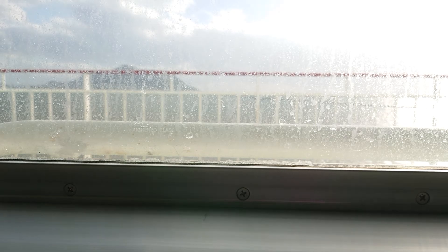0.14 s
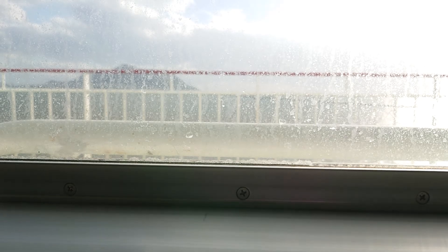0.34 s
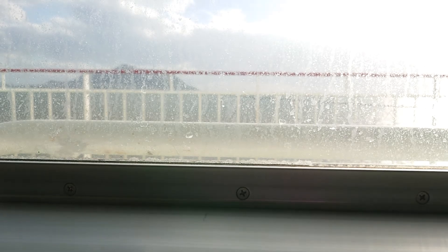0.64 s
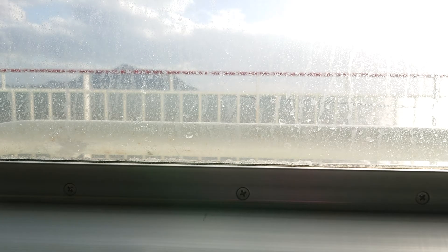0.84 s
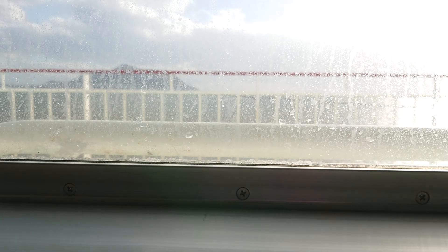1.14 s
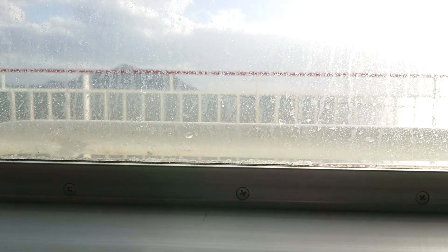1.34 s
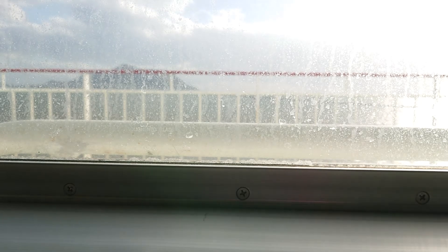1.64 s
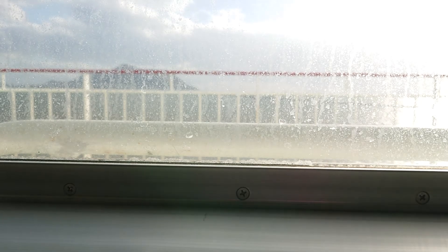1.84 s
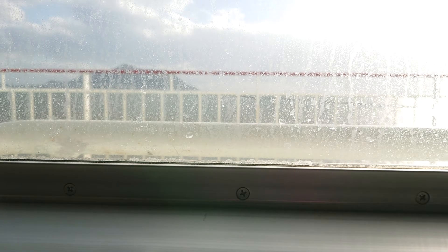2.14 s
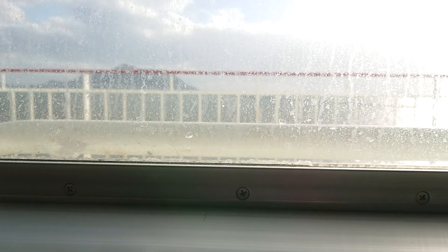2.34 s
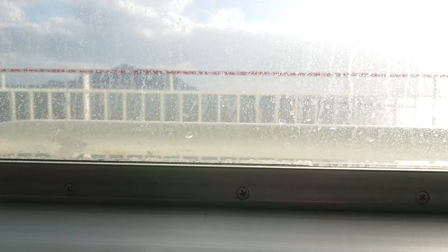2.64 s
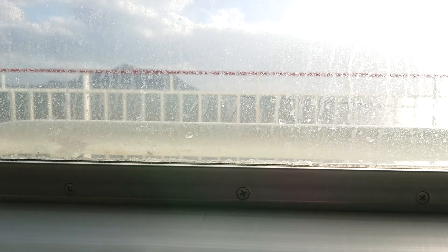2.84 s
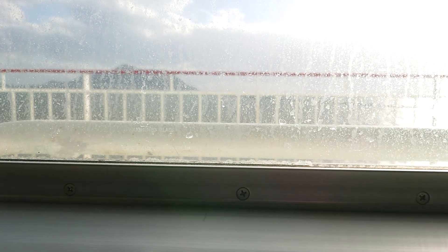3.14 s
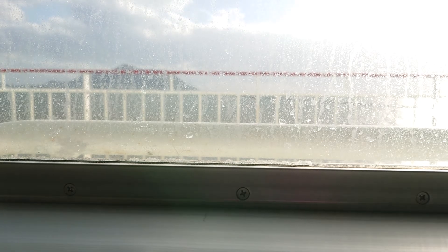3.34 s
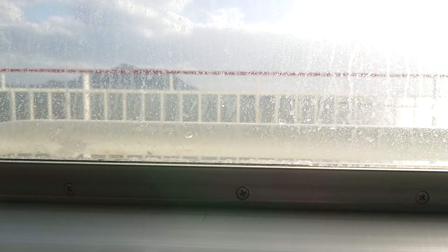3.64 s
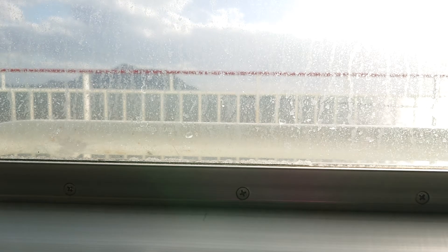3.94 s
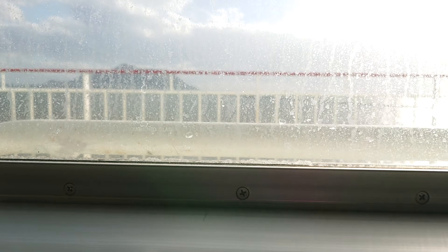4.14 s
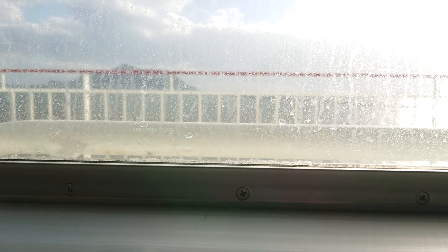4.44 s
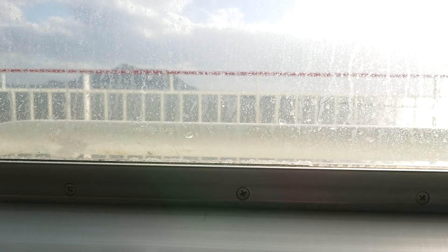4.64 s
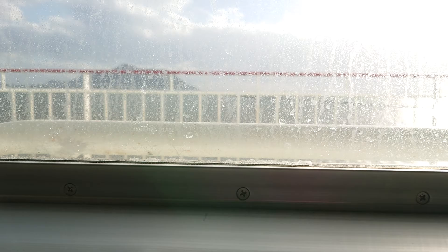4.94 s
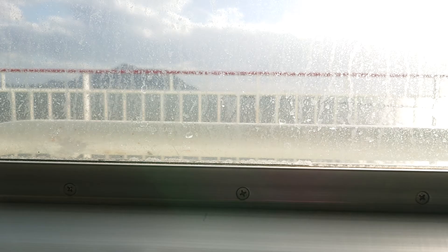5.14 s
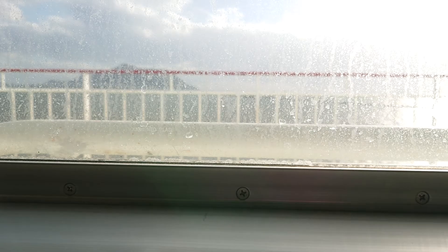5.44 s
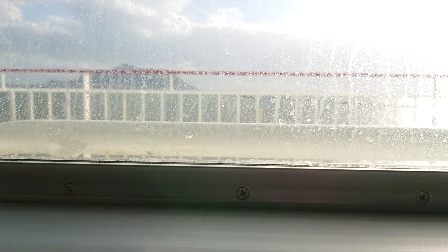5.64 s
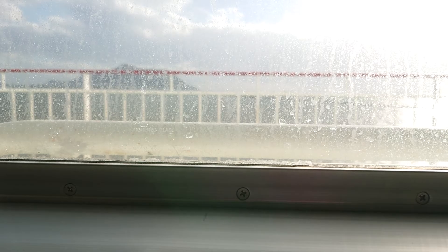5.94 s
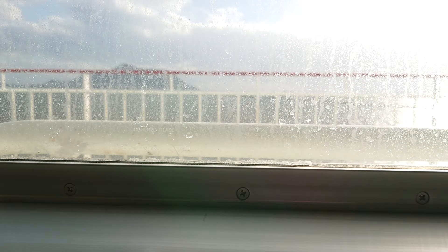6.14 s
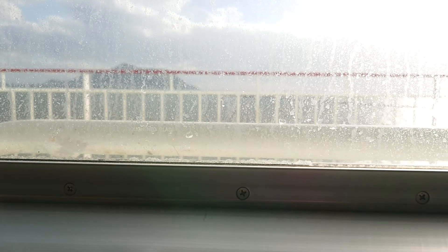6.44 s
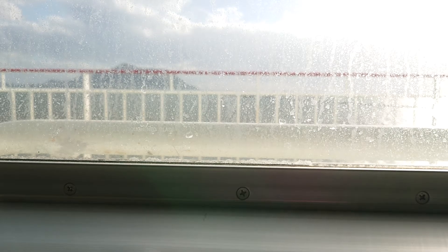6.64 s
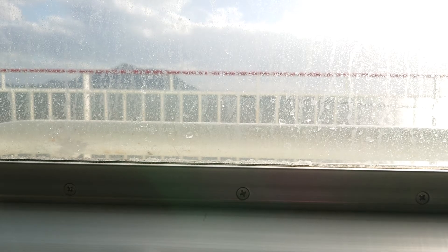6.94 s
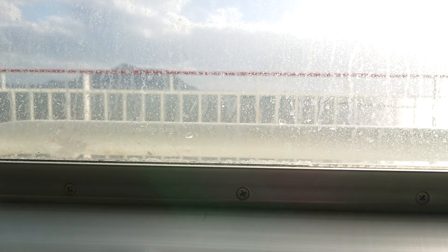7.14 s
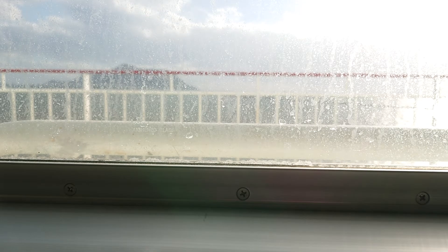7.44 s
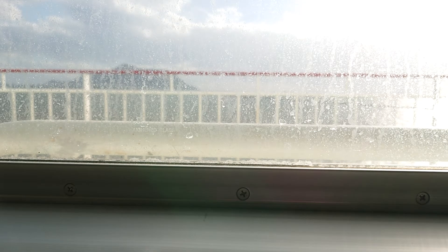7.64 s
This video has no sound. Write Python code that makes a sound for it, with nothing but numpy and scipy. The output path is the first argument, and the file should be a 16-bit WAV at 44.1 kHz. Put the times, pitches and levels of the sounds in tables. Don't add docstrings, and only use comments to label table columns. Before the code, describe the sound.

Inside a moving ship's cabin, twin diesels drone and slowly throb through the hull while ventilation whispers and a window fitting ticks irregularly.

```python
import sys
import numpy as np
from scipy import signal
from scipy.fft import irfft
from scipy.io import wavfile

SR = 44100
rng = np.random.default_rng(int(sys.argv[2]) if len(sys.argv) > 2 else 0)


def generate_wav(sig):
    pcm = np.round(np.clip(np.atleast_2d(sig).T, -1, 1) * 32767).astype(np.int16)
    wavfile.write(sys.argv[1], SR, pcm)


def rack_gain(trim_db):
    fader = np.asarray(trim_db, float)
    return 10 ** (fader / 20)


N = 343980

FIRING_HZ = [36.04, 53.94, 72.08, 178.0]
# level/dB, second engine's share/dB
FIRING_DB = [(-35.5, -5.5), (-30.5, -7.5), (-40.5, -13.5), (-37, -6)]
# offset f/Hz, in step at t/s
FIRING_TWINS = [(.075, .9), (-.52, .55), (.47, 1.8), (-.815, .55)]
SHAFT_HZ = [29.82, 40.45, 42.07, 48.35, 60.06, 67.95, 80.9, 134.5, 141.8, 175.7, 198.27, 233.4, 283.8,
            471.14, 530.03, 1047.6, 1106.8]
SHAFT_DB = [-52, -54.5, -47.5, -44, -44.5, -48, -46.5, -47, -46.5, -47, -59.5, -53, -59.5, -60.5, -63,
            -75.5, -75.5]
# t/s, f/Hz
WHINE_HZ = [(0, 3051), (3.0, 3040), (4.3, 3033), (7.8, 3017)]
# middle t/s, length/s, left level/dB, right level/dB
WHINE_CRESTS = [
    (.65, .5, 11, 2),
    (1.95, 3.1, 0, 14),
    (3.35, .9, 8, 0),
    (4.25, .7, 0, 9),
    (5.3, 1.5, 11, 3),
    (7.2, 1.9, -2, 13),
]
# f/Hz, density/(dB per Hz)
HULL = [(20, -84.5), (26, -77), (33, -64), (42, -53), (55, -48.5), (75, -51.5), (90, -57), (120, -54.5),
        (165, -57), (210, -63), (300, -61.5), (390, -67), (500, -71), (700, -76.5)]
# f/Hz, density/(dB per Hz)
AIR = [(700, -77.5), (1000, -79.5), (1200, -83), (1500, -89), (2000, -91), (2700, -99.5), (3500, -104),
       (5000, -110.5), (7000, -115.5), (8200, -123)]
# f/Hz, width/Hz, level above rumble/dB
PANELS = [(51.7, 6, 0), (113.2, 19, 2.5), (139.1, 14, 8), (170.6, 9.7, 5), (232.6, 12, 9), (254.2, 10, 4.5),
          (312, 5.1, -4.5), (337, 18, 5), (421.4, 13, 4.5), (907.7, 21, 8.5), (934, 16, 4.5),
          (1115, 20, 4.5), (1299, 18, 8.5)]
# f/Hz, density/(dB per Hz)
HISS = [(8200, -123), (9500, -116), (11000, -113), (13000, -108.5), (14500, -107.5), (15700, -109)]
# middle t/s, length/s, level/dB
HISS_SWELLS = [
    (.5, .2, -0.5),
    (2.41, 0.11, -1.5),
    (3.16, .2, 1.5),
    (5.15, .1, 2),
    (6.87, .55, 4),
    (7.42, .08, -1),
    (7.54, .1, 3.5),
]
# t/s, crack level/dB, low share/dB, high share/dB
TICKS = [(0.595, -63, -5, -14), (1.3279, -71, 6.5, -11), (1.768, -75, 8, -11), (2.0357, -62.5, 0, -12),
         (2.137, -61.5, 2, -13), (2.641, -63, 3, -11), (2.7516, -66.5, 2, -12), (2.9496, -62.5, 1, -17.5),
         (3.1694, -61, -1, -11), (3.3772, -68, 1, -9), (3.477, -64.5, -3, -9), (4.208, -66, 8, -7),
         (4.2157, -65, 10, -2), (4.226, -69, 8, -3), (4.7222, -62, -2, -13), (5.224, -63, 1, -14.5),
         (5.4241, -59.5, -5, -16.5), (6.165, -62.5, 1, -15), (6.3614, -71, -2, -8), (6.4632, -66, 2, -10),
         (6.6648, -65, 0, -11), (6.9794, -67, 4, -11), (7.2094, -68, 2, -11), (7.4744, -65, 0, -13)]
# t/s, crack level/dB, low share/dB, high share/dB
NEAR_TICK = (4.5497, -63, 15, -14)
# low edge f/Hz, high edge f/Hz
TICK_BANDS_HZ = [(1400, 3500), (3500, 5000), (5000, 8600)]
# f/Hz, likeness/(0-1)
PORT_LIKENESS = [(40, .998), (75, .96), (140, .97), (230, .92), (300, .82), (500, .33), (700, .12),
                 (1200, .27), (1800, .2), (2600, 0)]
# f/Hz, lead/rad
PORT_LEAD_RAD = [(30, 0.9), (70, -0.03), (110, 0.29), (230, 0.48), (400, -0.28), (550, 0.17), (700, 3),
                 (2000, 2.5)]
# f/Hz, level/dB
PORT_BALANCE_DB = [(60, -2.5), (110, -2), (200, -2.5), (380, -1.5), (700, -3.5), (1290, -1.5), (2380, -1.0),
                   (4400, -1.5), (8120, 3), (15000, 3)]


def read(points, hz):
    f_hz, value = np.transpose(points)
    return np.interp(np.log(hz + 1), np.log(f_hz + 1), value)


def follow(rows):
    t_s, *columns = np.transpose(rows)
    return [np.interp(np.arange(N) / SR, t_s, c) for c in columns]


def drift(fastest_hz):
    hz = np.geomspace(.15, fastest_hz, 24)[:, None]
    start_turns = rng.random((24, 1))
    t_s = np.arange(0, N, 256) / SR
    slow = (np.sin(2 * np.pi * (hz * t_s + start_turns)) / np.sqrt(hz)).sum(0)
    return np.interp(np.arange(N) / SR, t_s, slow / slow.std())


def swells(rows, t_s):
    middle_s, length_s, *columns_db = np.transpose(rows)[:, :, None]
    hump = np.exp(-(2 * (t_s - middle_s) / length_s) ** 4)
    return np.array([(c * hump).sum(0) for c in columns_db])


def ports(hz):
    half = rack_gain(read(PORT_BALANCE_DB, hz) / 2) * np.exp(.5j * read(PORT_LEAD_RAD, hz))
    return np.array([half, 1 / half])


def noise(density_db):
    hz = np.fft.rfftfreq(N, 1 / SR)
    a, b, c, d = rng.standard_normal((len(hz), 4)).T
    same = np.clip(read(PORT_LIKENESS, hz), 0, 1)
    left = a + 1j * b
    right = same * left + np.sqrt(1 - same ** 2) * (c + 1j * d)
    spectrum = np.array([left, right]) * ports(hz) * rack_gain(density_db(hz))
    return irfft(spectrum, N) * np.sqrt(N * SR / 4)


def tone(hz, level_db, waver_db=0., twin=0.):
    turns = np.cumsum(hz * np.ones(N)) / SR + rng.random()
    wave = np.exp(2j * np.pi * turns) * (1 + twin)
    level = rack_gain(level_db + waver_db * drift(1.3))
    return np.sqrt(2) * level * (ports(np.mean(hz))[:, None] * wave).real


def engines():
    t_s = np.arange(N) / SR
    easing_db = -.35 * (t_s - t_s.mean())
    out = np.zeros((2, N))
    for hz, (db, twin_db), (off_hz, step_s) in zip(FIRING_HZ, FIRING_DB, FIRING_TWINS):
        twin = rack_gain(twin_db) * np.exp(2j * np.pi * off_hz * (t_s - step_s))
        out += tone(hz, db + easing_db, twin=twin)
    for hz, db in zip(SHAFT_HZ, SHAFT_DB):
        out += tone(hz, db, waver_db=3.0)
    return out


def whine():
    turns = np.cumsum(follow(WHINE_HZ)[0]) / SR
    trough_db = -86.5
    level_db = trough_db + swells(WHINE_CRESTS, np.arange(N) / SR) + 2.2 * drift(20)
    port_turns = np.array([[.3], [0]])
    return np.sqrt(2) * rack_gain(level_db) * np.sin(2 * np.pi * (turns + port_turns))


def rumble_db(hz):
    base_db = np.where(hz < AIR[0][0], read(HULL, hz), read(AIR, hz))
    return base_db + sum(db / (1 + (2 * (hz - f) / width) ** 2) for f, width, db in PANELS)


def rumble():
    broad = noise(lambda hz: rumble_db(hz) - 200 * (hz > AIR[-1][0]))
    return broad * rack_gain(.25 * drift(3))


def hiss():
    top = noise(lambda hz: read(HISS, hz) - 200 * (hz <= HISS[0][0]))
    return top * rack_gain(swells(HISS_SWELLS, np.arange(N) / SR) + 0.54 * drift(14))


def ticks():
    tail_db, near_tail_db = -7, -15
    onset_s, crack_t60_s, tail_t60_s, tail_rise_s = .001, .012, .26, .004
    right_db, right_lag = -3.0, 8
    t_s = np.arange(SR // 5) / SR
    out = np.zeros((2, N + SR))
    bands = [signal.butter(2, edges, "bandpass", fs=SR, output="sos") for edges in TICK_BANDS_HZ]
    bursts = rng.standard_normal((len(TICKS) + 1, 3, len(t_s)))
    crack_env = rack_gain(-60 * abs(t_s - onset_s) / crack_t60_s) * (t_s >= onset_s)
    tail_rise = np.minimum(t_s / tail_rise_s, 1)
    tails_db = [tail_db] * len(TICKS) + [near_tail_db]
    for (at_s, db, low_db, high_db), tick_tail_db, burst in zip(TICKS + [NEAR_TICK], tails_db, bursts):
        crack = np.sign(burst[2]) * crack_env
        crack = np.array([crack, rack_gain(right_db) * np.roll(crack, shift=right_lag)])
        tail = burst[:2] * rack_gain(tick_tail_db - 60 * t_s / tail_t60_s) * tail_rise
        parts = [signal.sosfiltfilt(band, crack + tail) for band in bands]
        gains_db = (low_db + 2, 0, high_db + 9)
        sound = sum(rack_gain(g) * p / p[:, :SR // 70].std() for g, p in zip(gains_db, parts))
        at = round((at_s - onset_s) * SR)
        out[:, at:at + len(t_s)] += rack_gain(db - 10.5) * sound
    return out[:, :N]


def scene():
    opening_share, opening_s = 0.44, 0.0066
    opening = 1 - (1 - opening_share) * np.exp(-np.arange(N) / SR / opening_s)
    return opening * (engines() + whine() + rumble() + hiss() + ticks())


def roll_off(x):
    return signal.sosfilt(signal.butter(12, 15890, fs=SR, output="sos"), x)


def record(dry):
    return roll_off(dry)


dry = scene()
out = record(dry)
generate_wav(out)
```